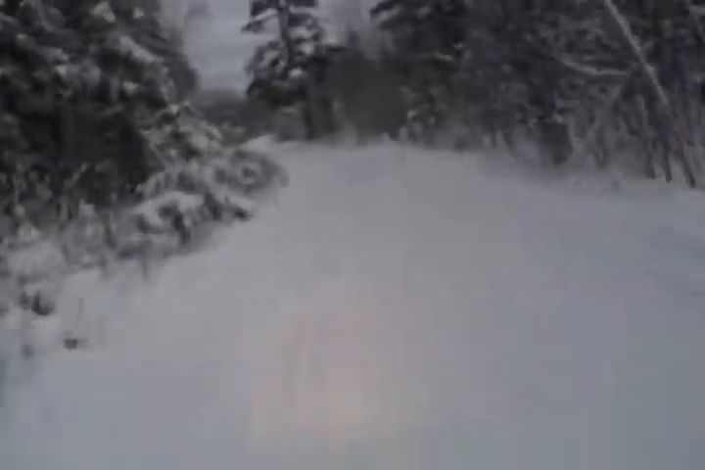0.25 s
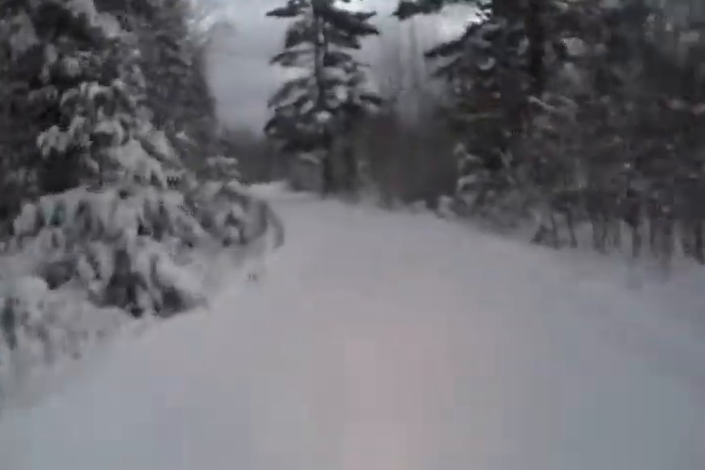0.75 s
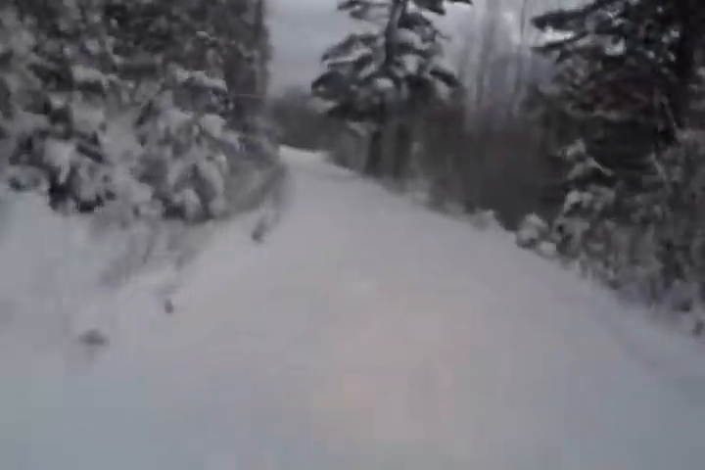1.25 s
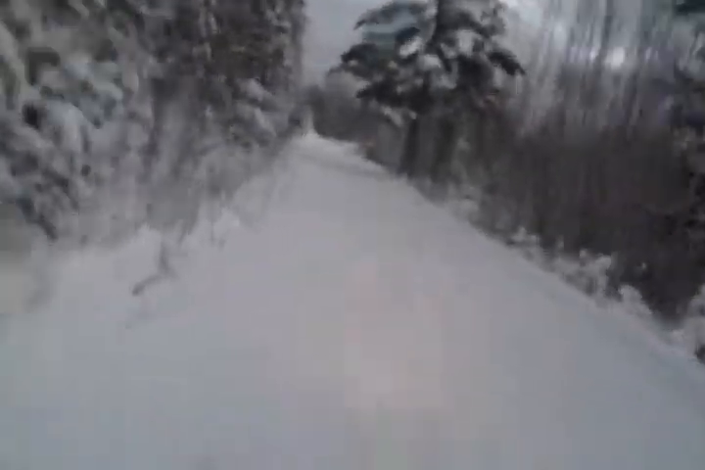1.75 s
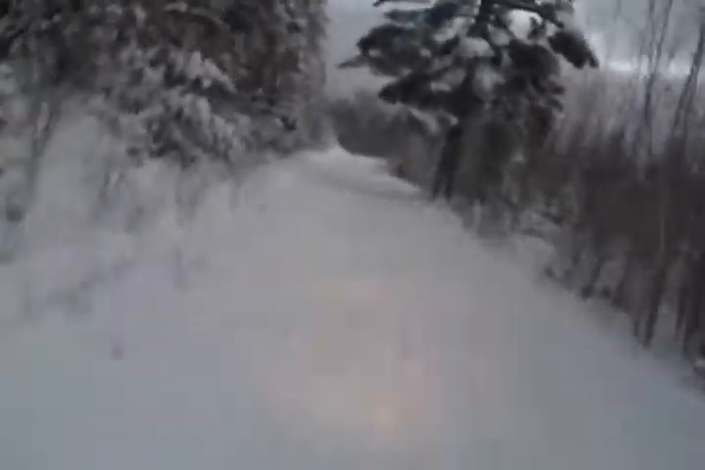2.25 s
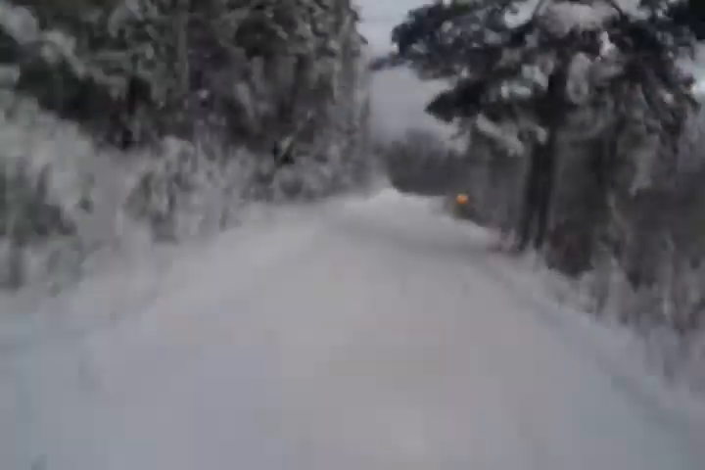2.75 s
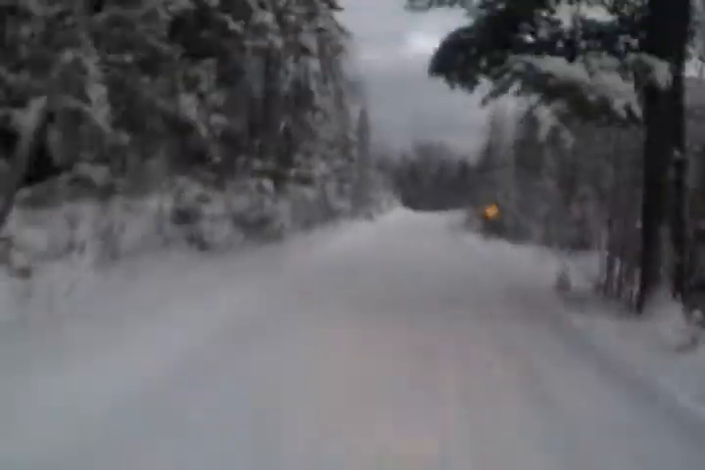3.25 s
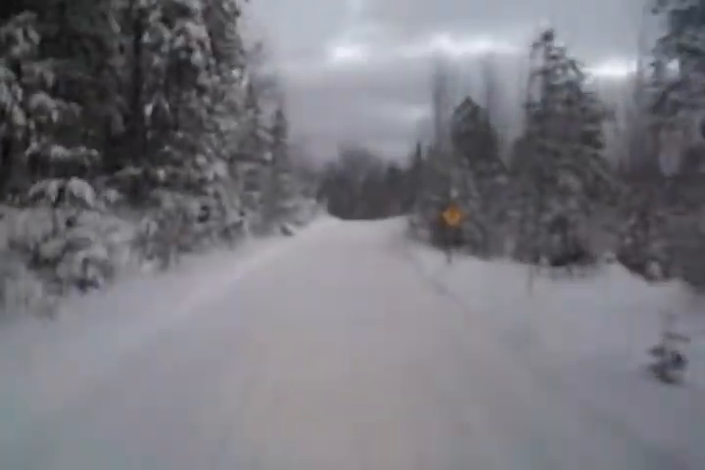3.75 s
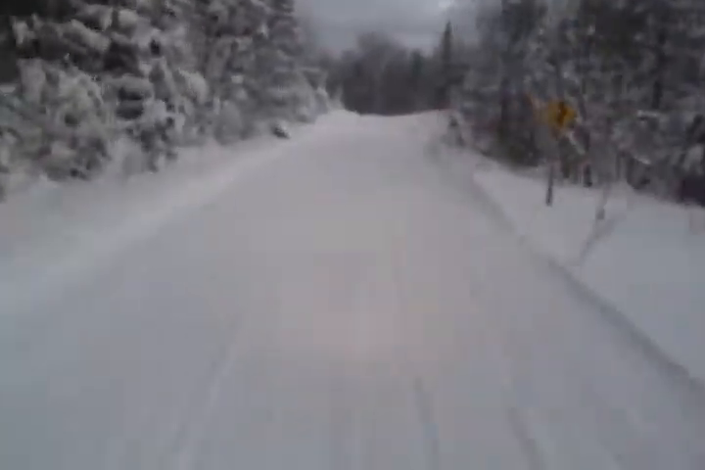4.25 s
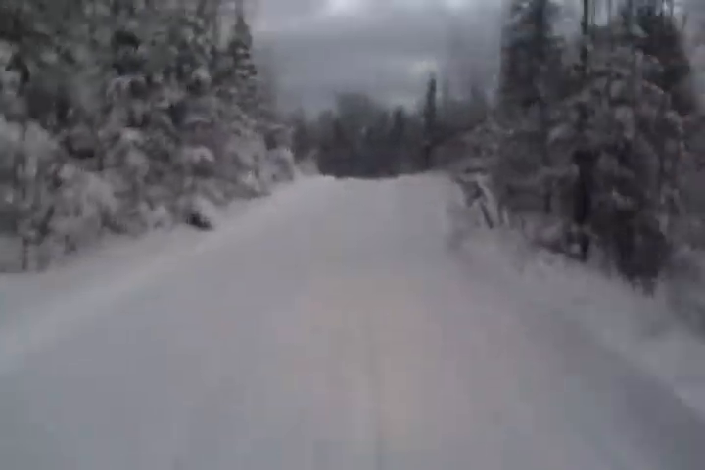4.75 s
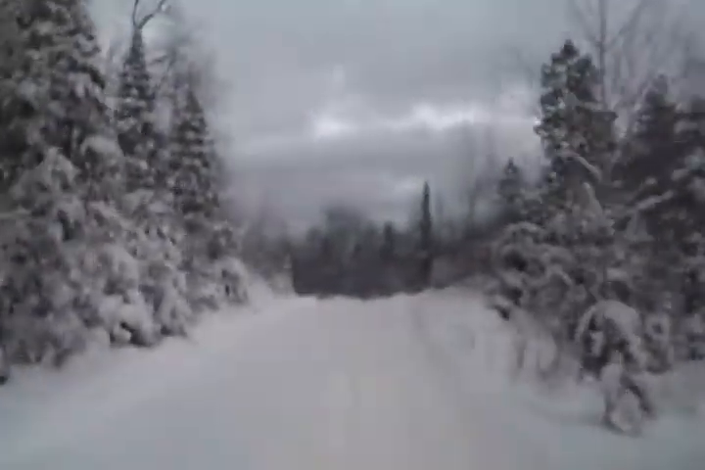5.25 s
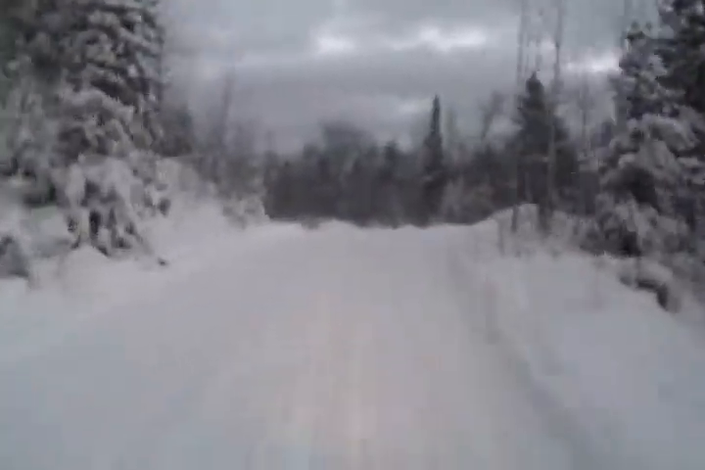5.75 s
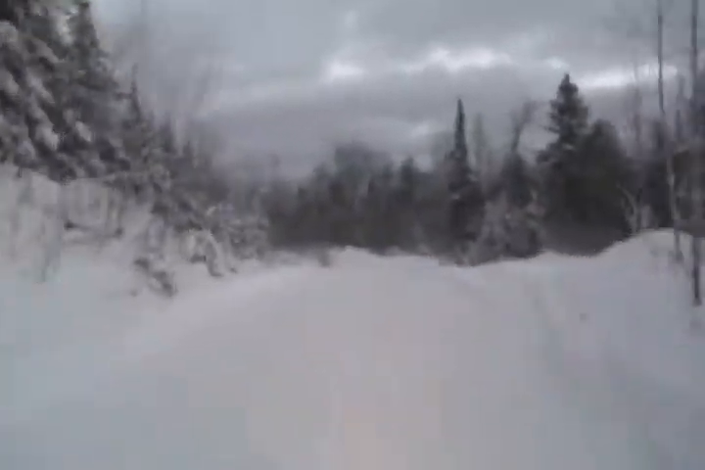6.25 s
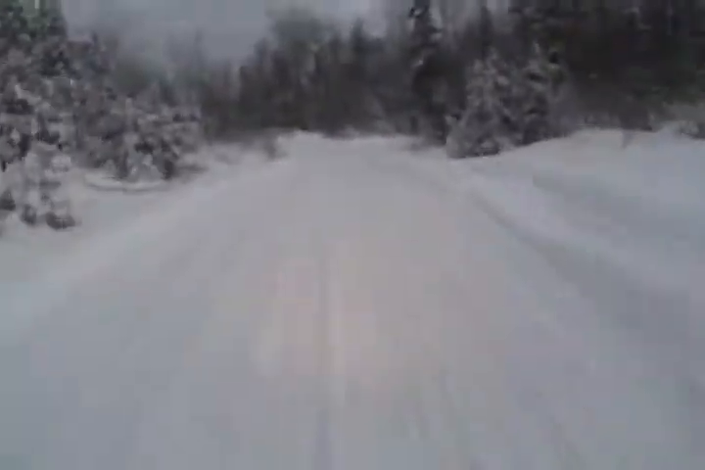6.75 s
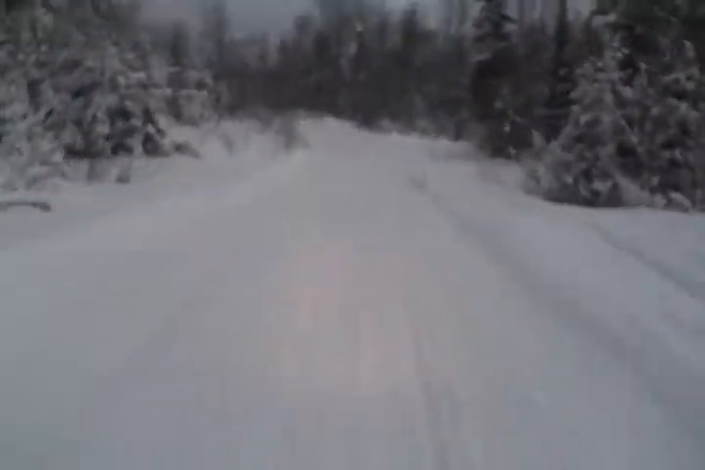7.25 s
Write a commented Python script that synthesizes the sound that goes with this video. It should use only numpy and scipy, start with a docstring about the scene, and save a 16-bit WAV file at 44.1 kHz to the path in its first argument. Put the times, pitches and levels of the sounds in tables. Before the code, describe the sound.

A snowmobile drones from start to finish, heard from the seat under a heavy, low wind rumble on the microphone. The buzzing engine blends with a track hum and a rattling rush of skis on snow. Its pitch creeps up over the first two seconds, holds, and peaks gently around 4.5 seconds. The machine is a little quieter from about 3.5 to 5.3 seconds. It then grows louder and buzzier while sagging in pitch until 6.5 seconds, and picks up again toward the end. Bumps give short, dull booms near 2, 2.8, 3.3 and 4 seconds. The wind thumps irregularly throughout. Its strongest surges overload the microphone, crackling and briefly choking the engine, around 0.5 and 2 seconds, repeatedly between 2.7 and 3.7 seconds, and again just after 5 seconds.

```python
"""A snowmobile's two-stroke engine drones on a groomed trail, heard from the rider's seat.
Its periodic exhaust pulses form a harmonic series, coloured by the resonances of the hood.
Track lugs hum as they strike the snow, the metal tunnel drums, and skis and chassis rush and rattle.
Turbulent headwind buffets the microphone; its biggest surges drive it into clipping
and choke all other sound for a moment."""
import sys
import numpy as np
from scipy.fft import rfft, irfft, next_fast_len
from scipy.io import wavfile
from scipy.ndimage import map_coordinates

SR = 44100
rng = np.random.default_rng(int(sys.argv[2]) if len(sys.argv) > 2 else 0)


def log_audio(samples):
    """Write samples as a 16-bit WAV file to the path given in sys.argv[1]."""
    # one column per channel
    frames = np.atleast_2d(samples).T
    # limit to full scale, then quantise
    limited = np.clip(frames, -1, 1)
    pcm = np.round(limited * 32767).astype(np.int16)
    wavfile.write(sys.argv[1], SR, pcm)


N = 331083

# Headwind rumble. Each row: time in seconds, level in dB.
WIND_LEVEL = [(.08, -18.5), (.17, -14), (.45, -15), (1, -13), (1.55, -15.5), (1.8, -11), (2.2, -18),
              (2.6, -16), (3.05, -16), (3.35, -24), (3.85, -19.5), (4.3, -18.5), (4.52, -19), (4.72, -15.5),
              (5.15, -17), (5.55, -14.5), (6.1, -11.5), (6.7, -16), (7.2, -15), (7.5, -6)]
# Single eddies. Each row: centre in seconds, half width in seconds, peak pressure before limiting.
EDDY_THUMPS = [(0.201, 0.021, 0.42), (0.289, 0.016, 0.49), (.735, 0.024, -0.22), (1.023, 0.008, 0.82),
               (1.125, 0.015, -0.7), (1.385, 0.0093, -0.31), (1.45, 0.011, .52), (1.69, 0.018, -0.63),
               (2.275, 0.049, 0.7), (3.926, 0.0095, 0.49), (4.005, 0.019, -0.66), (4.596, 0.039, 0.63),
               (4.79, 0.027, -0.47), (4.955, 0.055, 0.55), (5.28, 0.024, 0.91), (5.366, 0.04, 0.46),
               (5.72, .018, -0.69), (5.799, 0.016, -0.53), (5.924, 0.016, -0.82), (5.962, 0.013, 0.48),
               (6.029, 0.025, 0.4), (6.115, 0.013, 0.34), (6.284, .026, 0.44), (6.36, 0.015, -0.26),
               (6.399, 0.0081, .42), (6.465, 0.013, -0.49), (6.684, 0.019, -0.56), (6.78, 0.0043, 0.3),
               (6.886, 0.028, 0.38), (7.075, 0.021, -0.67), (7.236, 0.0067, -0.88)]
# Overloading air surges. Each row: centre in seconds, crest length in seconds, push +1 or suction -1.
PRESSURE_SURGES = [(.1, 0.02, 1), (0.49, 0.0067, -1), (0.521, 0.011, -1), (0.537, 0.0042, -1),
                   (0.628, 0.0041, 1), (0.837, 0.0025, 1), (0.978, 0.0071, -1), (1.538, 0.011, -1),
                   (1.806, .013, 1), (1.867, .002, 1), (1.973, 0.031, -1), (2.748, 0.018, -1),
                   (2.988, 0.078, 1), (3.178, 0.0054, -1), (3.212, 0.046, -1), (3.427, 0.006, 1),
                   (3.471, 0.058, 1), (3.669, 0.026, -1), (5.128, 0.027, -1), (5.509, 0.004, -1),
                   (5.597, 0.014, 1), (5.644, 0.0051, 1), (6.231, 0.01, 1), (7.437, 0.0079, 1)]
# The microphone stays choked after suction. Each row: centre in seconds, half width in seconds, loss in dB.
MIC_CHOKES = [(2.18, 0.025, 8), (2.841, 0.05, 5), (3.32, 0.036, 3.5), (5.17, 0.054, 7.5)]
# Spectra of wind, snow spray, rush and tunnel. Each row: frequency in Hz, relative density in dB.
WIND_SPECTRUM = [(3, -6), (8, 4), (15, 5), (26, -2), (42, -2), (80, -9.5), (150, -17), (300, -30),
                 (700, -55), (2000, -100)]
SPRAY_SPECTRUM = [(1500, -29), (3500, -7), (5000, 0), (6400, 1), (7200, -7), (8400, -5)]
RUSH_SPECTRUM = [(120, -10.5), (330, 2.5), (500, -1), (650, -3), (850, -2.5), (1100, -7), (1400, -9.5),
                 (1700, -15.5), (2050, -16), (2400, -20), (2850, -20.5), (3400, -24.5), (4200, -32.5),
                 (8000, -53.5)]
TUNNEL_SPECTRUM = [(90, -37.5), (158, 2.5), (205, -4), (285, -11), (340, -8.5), (450, -29), (900, -51)]
# The whole machine, quieter on the smooth middle stretch. Each row: time in seconds, gain in dB.
MACHINE_GAIN = [(0, -32.5), (.8, -33.5), (1.55, -31.5), (2, -34), (2.4, -33), (3, -35.5), (3.5, -40),
                (3.85, -37), (5.3, -36.5), (5.6, -32), (6.5, -34), (6.85, -35), (7.25, -32), (7.5, -32.5)]
# Bumps. Each row: centre in seconds, half width in seconds, boom level in dB, extra machine gain in dB.
TRAIL_BUMPS = [(1.62, 0.0087, 4, 2.5), (1.923, 0.013, 4, 2.5), (2.097, 0.014, 13, 1.5),
               (2.792, 0.017, 14, 5), (3.07, 0.015, 0, 0), (3.26, 0.043, 11, -2.5), (4.001, 0.016, 14, 1.5),
               (5.51, 0.049, -6, 2.5), (6.355, 0.012, 6, 3)]
# Speed of the drive track. Each row: time in seconds, lug rate in Hz.
TRACK_SPEED = [(0, 224), (.2, 221), (.9, 231), (1.5, 242), (2.4, 263), (3, 269), (4, 268), (4.65, 281),
               (5.5, 277), (6.65, 257), (7.5, 253)]
# Lug hum, fullest at low speed. Each row: time in seconds, relative level in dB.
HUM_LEVEL = [(.1, 10), (.5, 6.5), (1.3, 6.5), (2, 2.5), (3.7, 1.5), (4.3, 4), (5.5, 3.5), (6.25, 7),
             (6.9, .5), (7.4, 4)]
# The engine gathers pace, cruises, eases off and picks up. Each row: time in seconds, firing rate in Hz.
FIRING_RATE = [(0, 96), (.15, 95.2), (.9, 97.7), (1, 99.3), (1.16, 100.6), (1.6, 103.3), (2.25, 104.8),
               (2.6, 104.2), (3.9, 103.5), (4.3, 104.1), (4.57, 106.6), (5.22, 104.7), (5.8, 100.8),
               (6.35, 96.6), (6.62, 96.5), (7.12, 99.7), (7.35, 101.7), (7.51, 100.6)]
# Engine speed wavers most on rough ground. Each row: time in seconds, depth as a share of the firing rate.
FIRING_WAVER = [(1.3, .0015), (2, .006), (3.2, .006), (3.8, .0015)]
# Exhaust spectrum. Each row: multiple of the firing rate, relative level in dB.
EXHAUST_HARMONICS = [(1, 1.5), (2, -.5), (3, -12.5), (4, -14), (5, -12.5), (6, -13.5), (7, -14.8), (8, -13),
                     (9, -19), (10, -25), (11, -18), (12, -19), (13, -17.5), (14, -21), (15, -23.5),
                     (16, -28), (17, -26), (18, -28.5), (19, -28.5), (20, -27), (21, -31.5), (22, -32),
                     (26, -33.5)]
# Narrow resonances of the hood. Each row: frequency in Hz, width in Hz, boost in dB.
HOOD_RESONANCES = [(736, 30, 8), (995, 32, 12), (1260, 60, 4.5), (1660, 50, 6)]
# Open throttle sharpens the exhaust. Each row: time in seconds, gain of the upper harmonics in dB.
THROTTLE_BRIGHTNESS = [(0, 2.5), (1.3, 3), (2, -2), (5.2, -1.5), (5.7, -1), (6.1, 3.5), (6.6, 6.5),
                       (7, 5.5), (7.5, 1)]
# Harmonics sing out under load. Each row: multiple, centre in seconds, half width in seconds, boost in dB.
LOAD_FLARES = [(4, .45, .55, 8), (11, 1.1, .4, 6), (14, 1.2, .38, 10), (12, 2.2, .6, 6), (12, 4.3, 1.1, 6),
               (6, 5.65, .35, 8), (13, 5.6, .35, 7), (14, 5.75, .25, 7), (21, 5.9, .2, 6),
               (10, 6.45, .9, 9.5), (2, 4.75, .5, 4), (19, 6.55, .35, 5), (13, 7.25, .25, 5)]


def amp(db):
    """Amplitude ratio of a level in decibels."""
    return 10 ** (np.asarray(db) / 20)


def unit(x):
    """Normalisation to rms 1."""
    return x / np.sqrt(np.mean(x ** 2) + 1e-20)


def curve(rows):
    """Linear interpolation of (seconds, value) rows at every sample."""
    return np.interp(np.arange(N) / SR, *np.transpose(rows))


def wobble(rate):
    """Smooth random modulation: a spline through rate Gaussian knots a second."""
    coarse = np.arange(0, N + 64, 64)
    knots = rng.standard_normal(int(N * rate / SR) + 4)
    return np.interp(np.arange(N), coarse, map_coordinates(knots, [coarse * rate / SR], mode="nearest"))


def filtered(x, response):
    """Linear filtering: the spectrum of x times a frequency response."""
    size = next_fast_len(N + 8192)
    return irfft(rfft(x, size) * response(np.fft.rfftfreq(size, 1 / SR)), size)[:N]


def noise(spectrum):
    """Spectral shaping of white noise by (Hz, dB) points on a log axis, at rms 1."""
    points_hz, db = np.transpose(spectrum)
    white = rng.standard_normal(N)
    return unit(filtered(white, lambda hz: amp(np.interp(np.log(hz + 1), np.log(points_hz + 1), db))))


def swell(centre_s, width_s, steep=2):
    """A bell envelope of height 1; steeper ones have a flatter top."""
    return np.exp(-np.minimum(np.abs(np.arange(N) / SR - centre_s) / width_s, 10) ** steep)


def phase_of(hz):
    """Phase as the time integral of frequency."""
    return 2 * np.pi * np.cumsum(hz) / SR


def headwind(sway_db=-17, sway_rate=7, limit=.6):
    """Turbulence: small eddies rumble over a slow sway; big ones sweep them aside and thump."""
    thumps = sum(peak * swell(s, width, steep=3) for s, width, peak in EDDY_THUMPS)
    rumble = amp(curve(WIND_LEVEL)) * noise(WIND_SPECTRUM)
    sway = amp(sway_db) * np.tanh(wobble(sway_rate))
    pressure = (rumble + sway) * (1 - np.abs(thumps)) + thumps
    return pressure / (1 + (pressure / limit) ** 6) ** (1 / 6)  # soft limit, short of overload


def surges(build=.52, overshoot=.356, spread_s=.028, widen=.51, edge_s=.0034):
    """Overload: air pressure builds, then crests past the limit. Also gives the share of eddies left."""
    t = np.arange(N) / SR
    pushing, sucking, eddy_share = np.zeros(N), np.zeros(N), np.ones(N)
    for centre_s, length_s, direction in PRESSURE_SURGES:
        outside_s = np.abs(t - centre_s) - length_s / 2
        rise = np.exp(-(np.maximum(outside_s, 0) / (spread_s + widen * length_s)) ** 2.1)
        crest = .5 - .5 * np.tanh(outside_s / edge_s)
        surge = direction * (build * rise + overshoot * crest)
        pushing, sucking = np.maximum(pushing, surge), np.minimum(sucking, surge)
        eddy_share = np.minimum(eddy_share, (1 - .6 * rise) * (1 - .8 * crest))
    return pushing + sucking, eddy_share


def running_noise(firing_phase, rush_db=-.94, spray_db=-27, rattle_db=2.2, grain_db=3.5, jolt_db=.46):
    """Amplitude modulation: firings and ground jolts shake the chassis rush and the skis' snow spray."""
    throb = 1 + .09 * np.cos(firing_phase)
    shake = throb * amp(jolt_db * wobble(55))
    rush = unit(noise(RUSH_SPECTRUM) * shake * amp(rattle_db * wobble(260)))
    spray = unit(noise(SPRAY_SPECTRUM) * shake * amp(grain_db * wobble(500)))
    return amp(rush_db) * rush + amp(spray_db) * spray


def tunnel(level_db=-3, shake_db=2.5, boom_hz=285):
    """Forced vibration: the metal tunnel over the track drums all the time and booms on bumps."""
    drumming = amp(level_db) * unit(noise(TUNNEL_SPECTRUM) * amp(shake_db * wobble(20)))
    blows = sum(amp(db) * swell(s, width) for s, width, db, _ in TRAIL_BUMPS)
    return drumming + blows * np.sin(phase_of(boom_hz + 11 * wobble(60)))


def track(lug_hz, lug_phase, lugs_per_turn=50, belt_db=2.8, slip_rad=.42, fuzz_db=-1.3, slow_hz=222):
    """Periodic impacts: lugs on snow make a hum that swells each belt turn; uneven snow roughens it."""
    turn_db = belt_db * np.cos(lug_phase / lugs_per_turn + wobble(2))
    phase = lug_phase + slip_rad * wobble(16)
    hum = amp(curve(HUM_LEVEL) + turn_db + 2.2 * wobble(24)) * np.sin(phase)
    octave_db = -1 - .26 * (lug_hz - slow_hz) + turn_db + 3 * wobble(30)  # fades with speed
    octave = amp(octave_db) * np.sin(lug_phase + phase + slip_rad * wobble(40))
    fuzz = wobble(110) * np.sin(phase) + wobble(110) * np.cos(phase)  # a noise band around the hum
    return hum + octave + amp(fuzz_db) * fuzz


def engine(firing_hz, firing_phase, bright_hz=1650, flutter_db=2, jitter_rad=.2):
    """Source and filter: exhaust harmonics flutter in the airflow and are boosted by hood resonances."""
    throttle_db = curve(THROTTLE_BRIGHTNESS)
    exhaust = np.zeros(N)
    for order, db in EXHAUST_HARMONICS:
        hz = order * firing_hz
        hood_db = sum(boost / (1 + (2 * (hz - centre_hz) / width) ** 2)
                      for centre_hz, width, boost in HOOD_RESONANCES)
        bright_db = throttle_db * np.minimum(hz / bright_hz, 1) ** 8
        flare_db = sum(boost * swell(s, width)
                       for multiple, s, width, boost in LOAD_FLARES if multiple == order)
        gain = amp(db + hood_db + bright_db + flare_db + flutter_db * wobble(15))
        phase = order * firing_phase + jitter_rad * wobble(18) + rng.uniform(0, 2 * np.pi)
        exhaust += gain * np.sin(phase)
    return exhaust


def scene(slap_db=.8, lugs_per_slap=32):
    """Superposition: machine and wind add at one microphone."""
    firing_hz = curve(FIRING_RATE) * (1 + curve(FIRING_WAVER) * wobble(10))
    lug_hz = curve(TRACK_SPEED)
    firing_phase, lug_phase = phase_of(firing_hz), phase_of(lug_hz)
    slap = amp(slap_db * np.cos(lug_phase / lugs_per_slap))  # the belt's slack makes the noise pulse
    tones = engine(firing_hz, firing_phase) + track(lug_hz, lug_phase)
    chassis = slap * (tunnel() + running_noise(firing_phase))
    bump_db = sum(db * swell(s, width) for s, width, _, db in TRAIL_BUMPS)
    machine = amp(curve(MACHINE_GAIN) + bump_db) * (tones + chassis)
    surge_pressure, eddy_share = surges()
    choke_db = sum(db * swell(s, width) for s, width, db in MIC_CHOKES)
    sound = amp(-choke_db) * (machine + eddy_share * headwind())
    return (sound + surge_pressure)[None]


def record(dry, mic_top_hz=8480, clip_level=.705, output_top_hz=15700):
    """Hard clipping after the microphone's steep treble cut makes whatever rides on a surge crackle."""
    dull = filtered(dry[0], lambda hz: np.clip((mic_top_hz - hz) / 200 + .5, 0, 1))
    clipped = np.clip(dull, -clip_level, clip_level)
    return filtered(clipped, lambda hz: hz < output_top_hz)[None]


dry = scene()
out = record(dry)
log_audio(out)
```